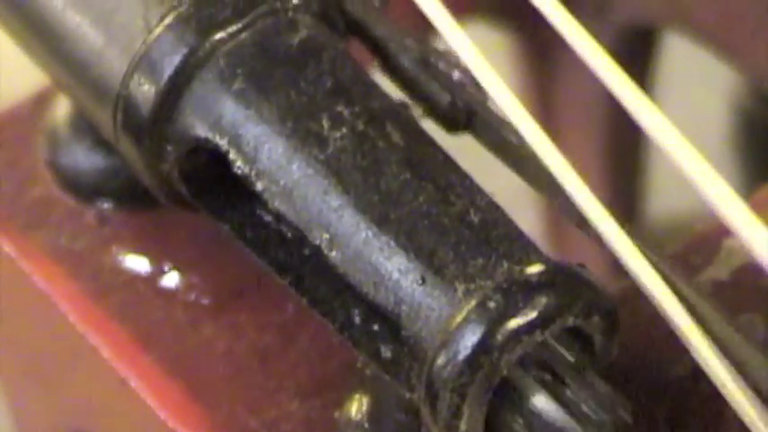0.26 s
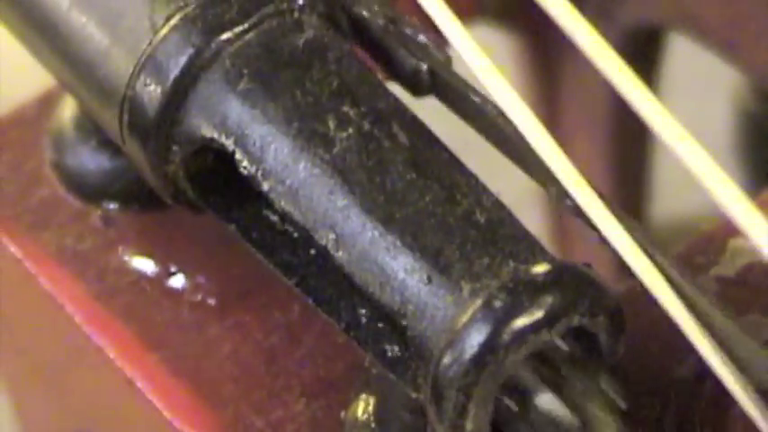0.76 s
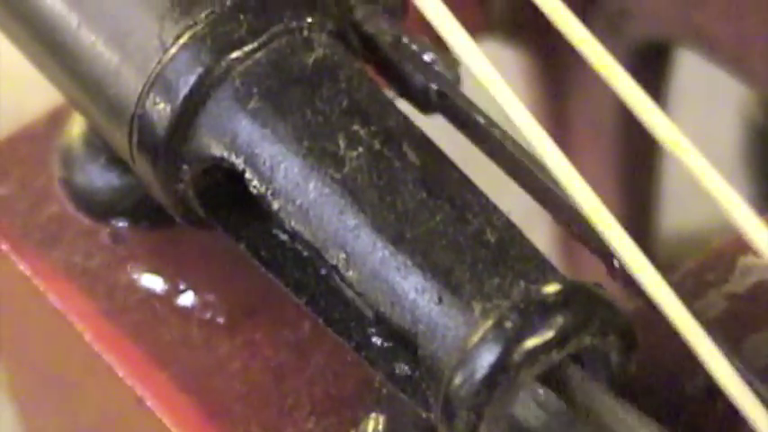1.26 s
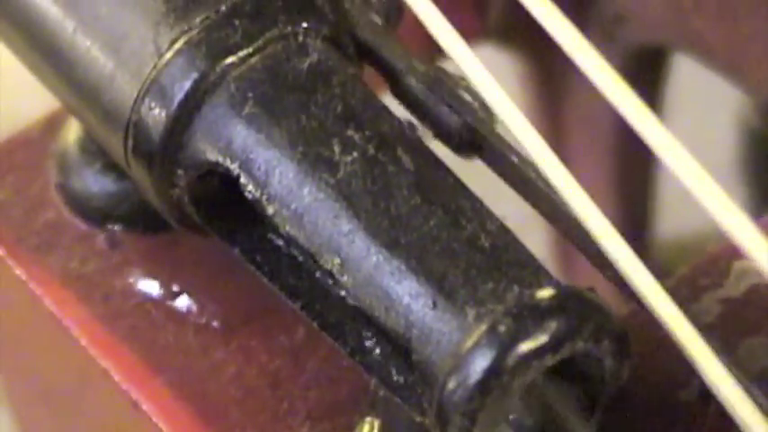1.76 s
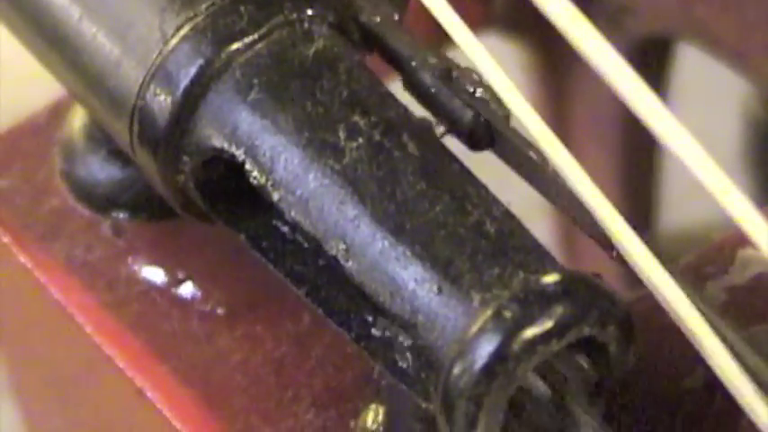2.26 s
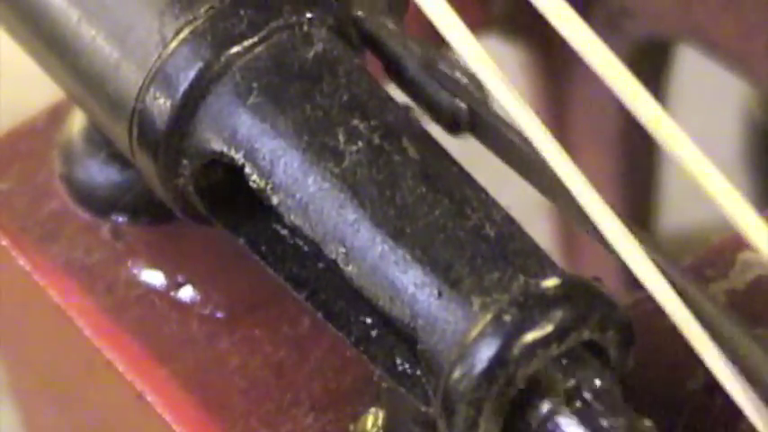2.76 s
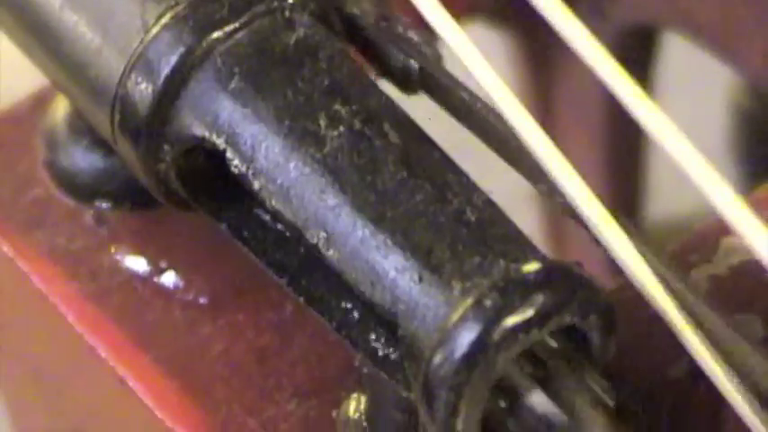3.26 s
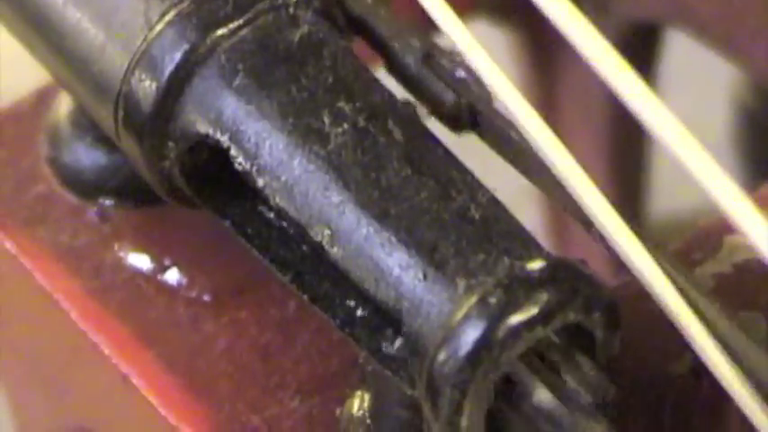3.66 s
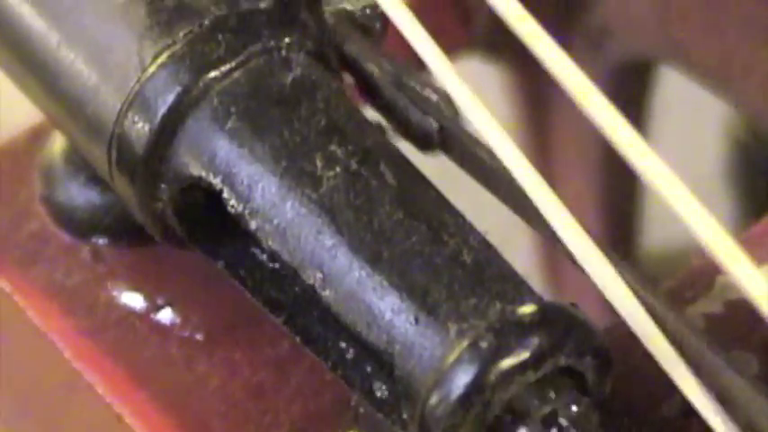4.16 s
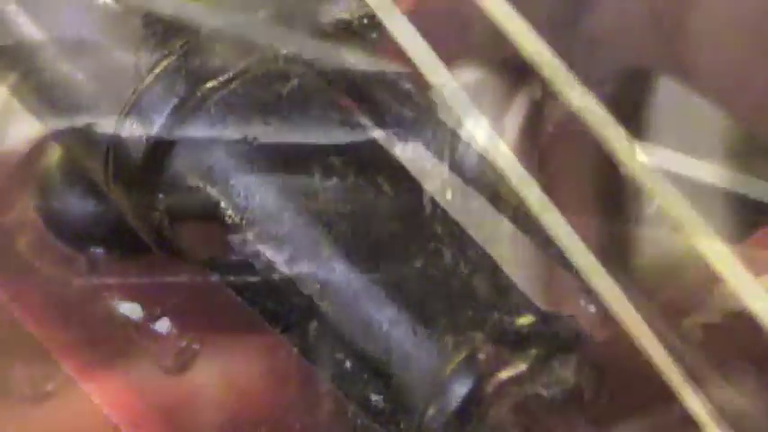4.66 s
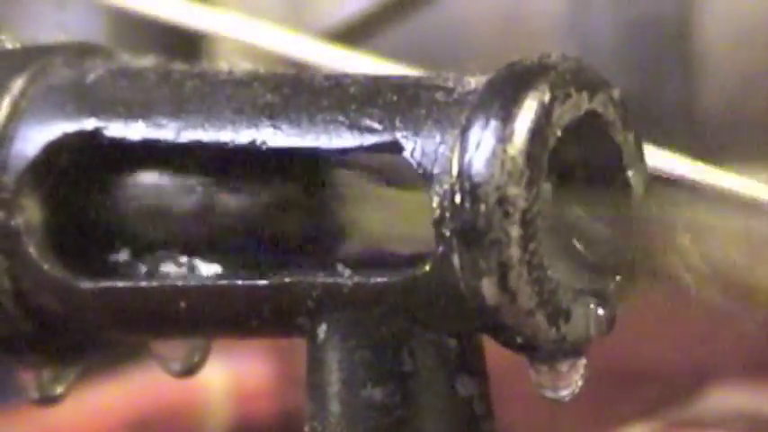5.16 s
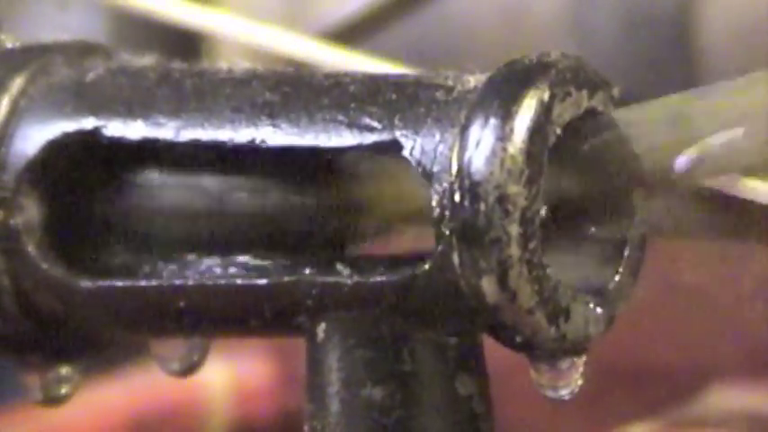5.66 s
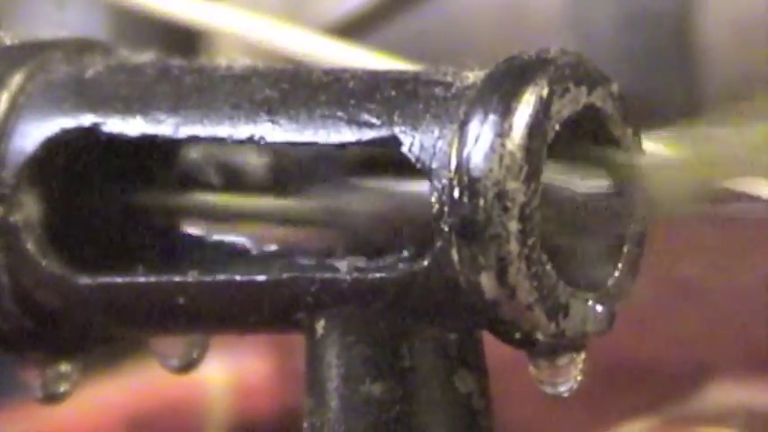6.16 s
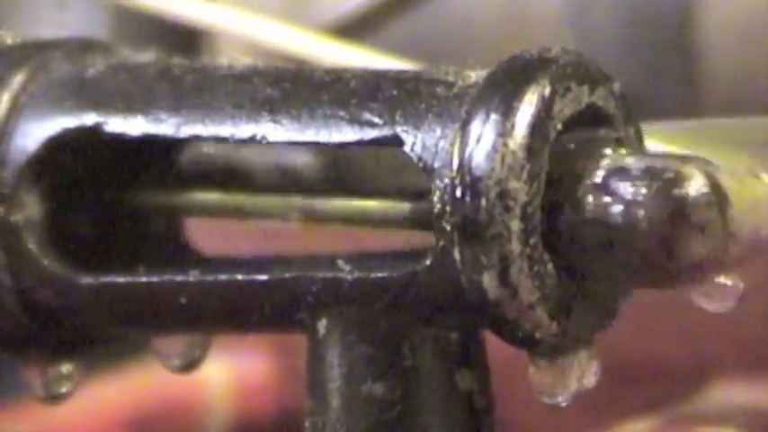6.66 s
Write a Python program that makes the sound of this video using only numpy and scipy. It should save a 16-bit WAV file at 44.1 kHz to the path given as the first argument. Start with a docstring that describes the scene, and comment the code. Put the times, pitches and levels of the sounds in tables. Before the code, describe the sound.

Close up, a little steam engine rattles and knocks in a quick, even rhythm while wet steam hisses and spits.

```python
"""On a table top, close up: a small toy steam engine runs fast on its tin base, heard first from above,
then, after a short cross-fade, from the side. Every turn of the crank the loose joints knock in the same
order and set the metal ringing, and the crosshead rattles in its guide. Wet steam sizzles out of the
gland, the valve spits in time with the crank, and the burner breathes faintly underneath."""
import sys
import numpy as np
from scipy import signal
from scipy.fft import rfft, irfft
from scipy.io import wavfile

SR = 44100
rng = np.random.default_rng(int(sys.argv[2]) if len(sys.argv) > 2 else 0)


def master_out(mix):
    """Clip the mix to full scale and print it as 16-bit PCM to the path in sys.argv[1]."""
    frames = np.transpose(np.atleast_2d(mix))
    ceiling = np.clip(frames, -1, 1)
    pcm = np.round(ceiling * 32767).astype(np.int16)
    wavfile.write(sys.argv[1], SR, pcm)


N = 305172

# The engine's tempo in each view: time_s, turns_made
TURNS_ABOVE = [(-0.1592, 0), (0.5668, 4), (1.291, 8), (2.0106, 12), (2.7244, 16), (3.4322, 20),
               (4.1348, 24), (4.8341, 28), (5.009, 29)]
TURNS_SIDE = [(4.4656, 0), (4.9499, 3), (5.4272, 6), (5.8998, 9), (6.3698, 12), (6.8397, 15), (7.154, 17)]
# The groove of one turn, a row per knock, with the blow into each of the seven ringing parts:
# turn_share, table_db, base_plate_db, frame_db, crank_db, rods_db, guide_db, pins_db
KNOCKS_ABOVE = [ (.060, -46, -60, -20, -33, -28, -39, -40), (.136, -56, -59, -28, -22, -26, -36, -41),
                (.165, -56, -58, -30, -36, -30, -38, -34), (.224, -56, -60, -29, -33, -32, -33, -32),
                (.415, -56, -42, -27, -21, -26, -36, -48), (.495, -48, -38, -28, -24, -27, -21, -22),
                (.508, -52, -50, -18, -27, -17, -20, -40), (.538, -45, -47, -26, -23, -24, -22, -44),
                (.562, -45, -50, -24, -32, -28, -30, -31), (.582, -46, -55, -21, -24, -17, -22, -42),
                (.700, -46, -44, -30, -34, -34, -33, -46), (.915, -60, -52, -30, -36, -36, -33, -33),
                (.974, -58, -50, -28, -21, -27, -33, -29), (.992, -50, -45, -22, -13.5, -16, -33, -31), ]
KNOCKS_SIDE = [(0.0, -63, -58, -29, -37, -33, -27, -31), (0.116, -55, -48, -30, -33, -41, -32, -38),
               (0.186, -52, -35, -25, -21, -23, -24, -32), (0.286, -52, -29, -25, -25, -28, -19, -24),
               (0.318, -56, -36, -21, -36, -30, -24, -40), (0.335, -34, -45, -36, -32, -28, -23, -33),
               (0.358, -48, -46, -26, -35, -25, -19, -28), (0.41, -44, -49, -26, -43, -28, -39, -41),
               (0.53, -58, -56, -28, -36, -36, -32, -44), (0.705, -60, -46, -27, -44, -36, -36, -30),
               (0.735, -54, -46, -37, -47, -36, -31, -29), (0.776, -46, -45, -23, -26, -25, -29, -25),
               (0.805, -49, -55, -27, -27, -30, -41, -46), (0.9, -61, -58, -30, -35, -39, -39, -41)]
# The voice of each part, in that order, a row per mode: pitch_hz, t60_s, above_db, side_db
PART_MODES = [
    [(66.4, 0.17, -13.5, -22), (104, 0.054, -25, -38), (148, 0.092, -0.5, -10), (220, 0.15, -6, 1)],
    [(340, 0.068, -0.5, -2.5), (502.4, 0.079, -8.5, -5), (661, 0.019, 4, 0)],
    [(936, 0.072, -30, -9), (999.7, 0.04, -10.5, -1), (1034.7, 0.033, -1, -21), (1110, 0.14, -15.5, -19),
     (1213, 0.05, -5.5, -5)],
    [(1339, 0.045, -10, -9), (1437, 0.011, 2.5, -19), (1596, 0.022, 0, -1), (1721, 0.027, -24.5, 0)],
    [(1967, 0.051, -4.5, -2), (2295, 0.062, -9.5, -11.5), (2372, 0.027, -1, -26), (2533, 0.017, -31, -1),
     (3011, 0.043, -6.5, -11.5)],
    [(3530, 0.026, -17, -5), (3973, 0.035, -5, -6.5), (4207, 0.031, -9, -7), (4790, 0.075, -9.5, -19),
     (4940, 0.023, 0, -31), (5220, 0.035, -6.5, -23)],
    [(8190, 0.0016, 12.5, 6.5), (9260, 0.0063, -4, 5), (11300, 0.0023, -13, -15),
     (11150, 0.015, -10.5, -15), (11970, 0.012, 0.5, -20)],
]
# The rattle that fills in between knocks, per part: level_db
RATTLE_ABOVE = [-54, -69, -32, -38.5, -36, -43.5, -97]
RATTLE_SIDE = [-65, -50.5, -34, -43, -46, -49, -65.5]
# How loosely each part bounces after a blow: bounce_gain
BOUNCE_GAIN = [.3, .5, 1, 1, 1, 1.2, 1]
# How long that bounce chatters, per part: decay_s
CHATTER_S = [.008, .006, .004, .0025, .004, .005, .0012]
# Where each part's low end thins out because it radiates poorly: low_cut_hz
PART_LOW_CUT_HZ = [40, 90, 840, 1100, 1500, 2900, 7500]


def clatter(turns, knocks, rattle_db, level_column, fader):
    """Loose joints knock, bounce and rattle, ringing every part; rows: direct and scattered sound."""
    play_s, blow_spread_db, part_spread_db, mode_spread_db = .0004, 1.3, .18, 2.5
    knocks, (times, turns_made) = np.array(knocks), np.transpose(turns)
    knock_s = np.interp(np.arange(turns_made[-1])[:, None] + knocks[:, 0], turns_made, times)
    onsets = np.round((knock_s + play_s * rng.standard_normal(knock_s.shape)) * SR).astype(int)
    span = np.flatnonzero(fader)
    first, size = span[0], len(span)
    audible = (onsets >= first) & (onsets < first + size)
    hits = onsets[audible] - first
    accent_db = blow_spread_db * rng.standard_normal(onsets.shape)
    # the rattle swells slightly after each reversal of the piston, twice a turn
    swell_db, peak_share = .5, .082
    swell = from_db(swell_db * np.cos(4 * np.pi * (in_time(turns)[span] - peak_share)))
    rattle = grains(per_s=900., spread_db=3.5)[:, span] * swell
    out = np.zeros((2, N))
    for part, modes in enumerate(PART_MODES):
        blow_db = knocks[:, 1 + part] + accent_db + part_spread_db * rng.standard_normal(onsets.shape)
        blows = np.zeros(size)
        blows[hits] = from_db(blow_db)[audible]
        # after the clean blow the metal bounces: noise that dies in a few ms
        fade = np.exp(-1 / (CHATTER_S[part] * SR))
        bounce = signal.lfilter([np.sqrt(1 - fade ** 2)], [1, -fade], BOUNCE_GAIN[part] * blows)
        ringing = 0
        for mode in modes:
            hz, t60 = mode[:2]
            force = bounce * rng.standard_normal((2, size)) * [[.3], [.8]]
            # the clean blow is all direct, and finds each mode with a strength of its own
            strength = from_db(mode_spread_db * rng.standard_normal(onsets.shape))[audible]
            force[0, hits] += .9 * blows[hits] * strength
            # scaled so that long-ringing modes build up no more rattle than short ones
            force += rattle * from_db(rattle_db[part]) * np.sqrt(4 * np.log(1000) / (t60 * SR))
            ringing = ringing + ring(force * fader[span] * from_db(mode[level_column]), hz, t60)
        out[:, span] += butterworth(ringing, 6, PART_LOW_CUT_HZ[part], "high")
    return out


def ring(force, hz, t60):
    """One struck mode rings as a dying sine; little is radiated far from its pitch."""
    decay, angle = from_db(-60 / (t60 * SR)), 2 * np.pi * hz / SR
    tone = signal.lfilter([0, np.sin(angle)], [1, -2 * decay * np.cos(angle), decay ** 2], force + 1e-18)
    return butterworth(tone, 2, [.65 * hz, 1.6 * hz], "band")


# The ride of the steam leak: time_s, level_db
LEAK_LEVEL = [(0, -21.5), (.3, -23), (1.0, -24), (1.5, -22), (1.7, -24), (2.2, -23), (2.3, -22),
              (2.8, -25.5), (3.0, -22.5), (3.38, -23.5), (3.5, -28), (4.2, -27), (4.3, -25.5), (4.84, -33),
              (4.92, -23), (5.4, -22.5), (5.46, -31), (5.55, -22), (5.63, -25), (5.67, -32), (5.82, -36),
              (5.87, -24.5), (6.0, -24), (6.1, -32), (6.3, -26.5), (6.36, -22.5), (6.62, -28.5),
              (6.69, -25.5), (6.8, -31), (6.92, -28)]
# The sizzle's tone colour in each view: frequency_hz, level_db
SIZZLE_ABOVE = [(1880, -24), (3200, -8.5), (4060, -8), (4400, -9.5), (4730, -3.5), (5360, 0), (6850, -3.5),
                (8520, -18.5), (11900, -20.5), (13600, -20), (14700, -54), (15600, -78)]
SIZZLE_SIDE = [(1880, -8.5), (3200, 0), (3930, 3.5), (4790, 5.5), (5690, 13.5), (6670, 4), (7770, 0),
               (9230, -43), (10700, -8.5), (12600, -16), (14600, -49), (15600, -44)]
# Faint whistles of the gland on top of the sizzle: pitch_hz, width_hz, boost_db
WHISTLES_ABOVE = [(5340, 150, 5.5), (5735, 40, 5), (6100, 70, 3), (6640, 150, 3)]
WHISTLES_SIDE = [(5450, 70, 4), (5750, 200, 5), (6150, 80, 3)]


def gland_sizzle(side_share):
    """Droplets burst in the steam jet: dense grains on smooth hiss, sputtering, coloured by the gland."""
    jet = .6 * grains(per_s=2500., spread_db=6.) + .68 * rng.standard_normal((2, N))
    sputter_db = 1.2 * drift(rate_hz=30.) + 1.75 * drift(rate_hz=300.)
    jet = jet * from_db(sputter_db)
    above = np.sqrt(1 - side_share) * colour(jet, SIZZLE_ABOVE, WHISTLES_ABOVE)
    side = np.sqrt(side_share) * colour(jet, SIZZLE_SIDE, WHISTLES_SIDE)
    return from_db(in_time(LEAK_LEVEL)) * (above + side)


# The valve's pattern of spits and puffs over one turn: turn_share, level_db
VALVE_ABOVE = [(0, -19), (.05, -32), (.25, -28), (.3, -46), (.48, -54), (.5, -30), (.6, -42), (.9, -39),
               (.94, -41), (1, -23)]
VALVE_SIDE = [(0, -37), (.06, -27), (.27, -33), (.3, -19), (.4, -36), (.68, -30), (.72, -17), (.8, -30.5),
              (.86, -25), (.96, -30), (1, -11)]
# Where the spit sits in the top end: low_hz, high_hz
SPIT_BANDS = [(8300, 11100), (10500, 13000)]


def valve_spit(side_share):
    """The valve spits wet steam in time with the crank; each treble band flickers on its own."""
    above_db, side_db = each_turn(TURNS_ABOVE, VALVE_ABOVE), each_turn(TURNS_SIDE, VALVE_SIDE)
    level_db = (1 - side_share) * above_db + side_share * side_db
    drops = grains(per_s=5500., spread_db=5.) * from_db(level_db)
    flicker_db = 2.5
    return sum(butterworth(drops, 3, band, "band") * from_db(flicker_db * drift(rate_hz=40.))
               for band in SPIT_BANDS)


# The dark bed of burner and air: frequency_hz, level_db
BURNER_COLOUR = [(15, -50), (50, -30), (157, 6), (285, -35), (353, 13.5), (597, 5.5), (750, -3), (980, -49),
                 (1650, -120)]


def burner_air():
    """The burner and the air around it make a faint, steady, low rush."""
    return from_db(-55) * colour(rng.standard_normal((2, N)), BURNER_COLOUR)


# Stereo width, where a likeness of 1 is narrowest: frequency_hz, likeness_share
STEREO_LIKENESS = [(60, 0.099), (120, 0.86), (240, 0.54), (480, 0.74), (950, 0.92), (1890, 0.86),
                   (3770, 0.98), (7520, 0.6), (15000, 0.04)]
# Balance across the spectrum: frequency_hz, left_over_right_db
STEREO_BALANCE = [(60, 6.5), (100, 5.0), (180, 4.0), (310, 4.0), (550, 3.5), (950, 0.5), (1650, -1.0),
                  (2860, -1.0), (4970, 3.5), (8640, 4.5), (15000, 2.5)]
# Phase between the channels, negative where the left lags: frequency_hz, left_lead_rad
STEREO_PHASE = [(0, 0), (340, -0.4), (5340, -0.1), (5600, -0.2), (7320, -1.1), (15200, -0.4)]


def stereo_image(direct_and_scattered):
    """Both microphone ports share the direct sound; scatter off nearby surfaces comes in antiphase."""
    alike = np.clip(over_hz(STEREO_LIKENESS), 0, 1)
    lead_rad = over_hz(STEREO_PHASE + np.array([1, 0]))  # 1 Hz up keeps the log axis finite
    tilt = from_db(over_hz(STEREO_BALANCE) / 2) * np.exp(.5j * lead_rad)
    direct, scattered = rfft(direct_and_scattered) * np.sqrt([(1 + alike) / 2, (1 - alike) / 2])
    return irfft([(direct + scattered) * tilt, (direct - scattered) / tilt], N)


def grains(per_s, spread_db):
    """Two unrelated rows of random clicks of uneven size and sign, rms 1."""
    sizes = from_db(spread_db * np.minimum(rng.exponential(1, (2, N)), 4))
    signs = rng.choice([-1, 1], (2, N))
    return rms_one(sizes * signs * (rng.random((2, N)) < per_s / SR))


def drift(rate_hz):
    """A random wander, rms 1: noise twice through a one-pole low-pass."""
    pole = np.exp(-2 * np.pi * rate_hz / SR)
    return rms_one(signal.lfilter([1], [1, -2 * pole, pole ** 2], rng.standard_normal(N + SR))[SR:])


def colour(x, spectrum, whistles=()):
    """An EQ curve with optional narrow peaks on it; the result has rms 1."""
    hz = np.fft.rfftfreq(N, 1 / SR)
    peaks_db = sum(db / (1 + (2 * (hz - centre) / width) ** 2) for centre, width, db in whistles)
    return rms_one(irfft(rfft(x) * from_db(over_hz(spectrum) + peaks_db), N))


def butterworth(x, order, edges_hz, kind):
    """A filter with a flat passband."""
    return signal.sosfilt(signal.butter(order, edges_hz, kind, fs=SR, output="sos"), x)


def each_turn(turns, pattern):
    """A (turn_share, value) pattern looped at every turn of the crank."""
    return np.interp(in_time(turns) % 1, *np.transpose(pattern))


def in_time(curve):
    """A (time_s, value) curve at every sample."""
    return np.interp(np.arange(N) / SR, *np.transpose(curve))


def over_hz(curve):
    """A (frequency_hz, value) curve at every FFT bin, drawn on a log axis."""
    bin_hz = np.maximum(np.fft.rfftfreq(N, 1 / SR), 1)
    hz, values = np.transpose(curve)
    return np.interp(np.log(bin_hz), np.log(hz), values)


def from_db(db):
    """Gain of a level."""
    return 10 ** (np.asarray(db, float) / 20)


def rms_one(x):
    """Scaled to rms 1."""
    return x / np.sqrt(np.mean(x ** 2) + 1e-20)


# How hard the engine knocks and rattles: time_s, level_db
EFFORT = [(0.0, 1.5), (1.5, 1), (3.0, 1.5), (4.0, 2.5), (4.5, 0.5), (4.7, 2), (5.0, 3), (6.92, 3.5)]
# The move from above to the side: start_s, end_s
CROSSFADE_S = (4.66, 4.86)


def scene():
    """The mix: clatter and steam cross-fade from above to the side, over the burner."""
    side_share = in_time([(CROSSFADE_S[0], 0), (CROSSFADE_S[1], 1)])
    effort = from_db(in_time(EFFORT))
    above = clatter(TURNS_ABOVE, KNOCKS_ABOVE, RATTLE_ABOVE, level_column=2,
                    fader=effort * (1 - side_share))
    side = clatter(TURNS_SIDE, KNOCKS_SIDE, RATTLE_SIDE, level_column=3, fader=effort * side_share)
    bed = burner_air()
    return stereo_image(above + side + gland_sizzle(side_share) + valve_spit(side_share) + bed)


def record(dry):
    """The microphone drops the deep bass and rounds the highest peaks; the very top is cut."""
    low_cut_hz, high_cut_hz, ceiling = 60, 15719, .9
    thinned = butterworth(dry, 2, low_cut_hz, "high")
    rounded = thinned / (1 + np.abs(thinned / ceiling) ** 4) ** .25
    return signal.sosfilt(signal.cheby2(20, 65, high_cut_hz, fs=SR, output="sos"), rounded)


dry = scene()
out = record(dry)
master_out(out)
```